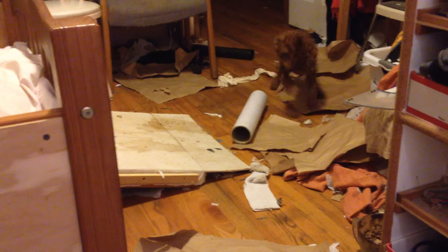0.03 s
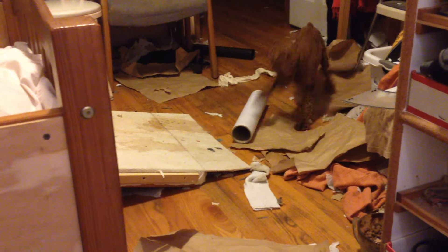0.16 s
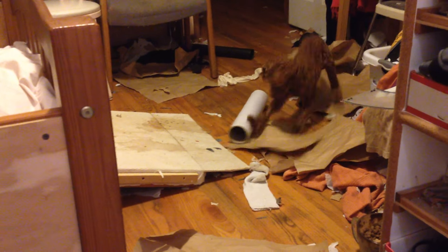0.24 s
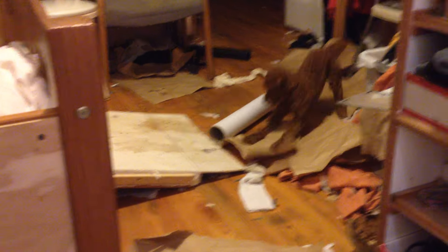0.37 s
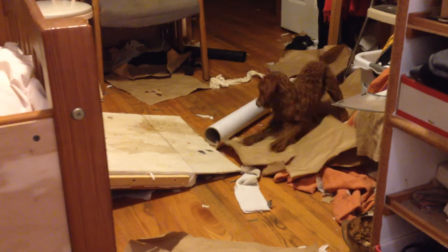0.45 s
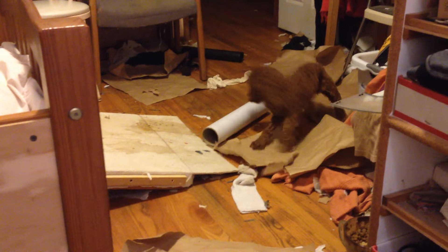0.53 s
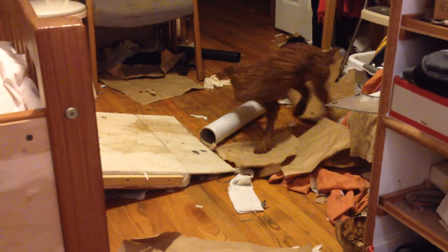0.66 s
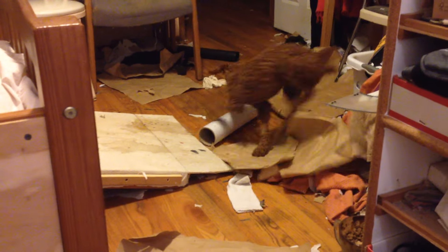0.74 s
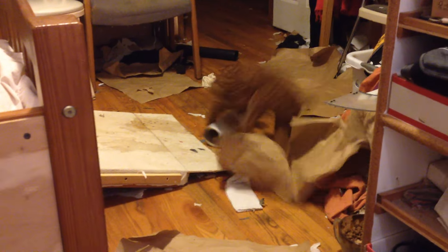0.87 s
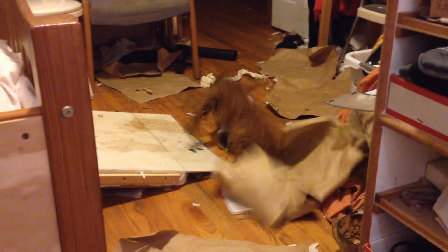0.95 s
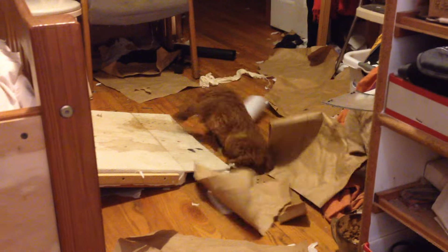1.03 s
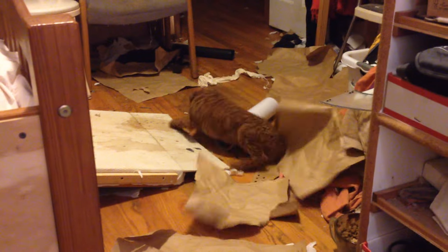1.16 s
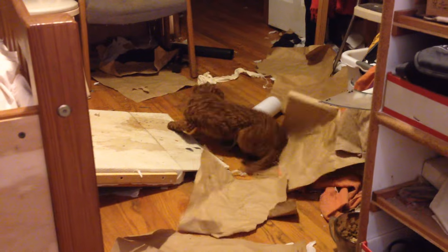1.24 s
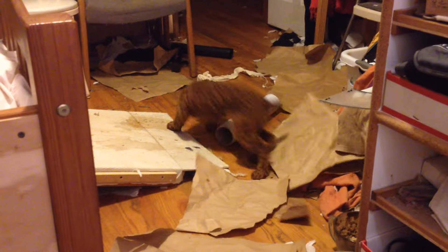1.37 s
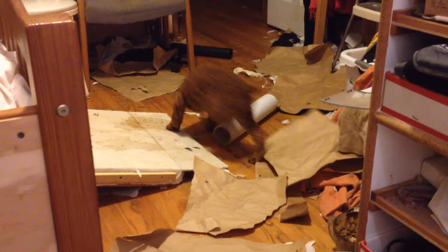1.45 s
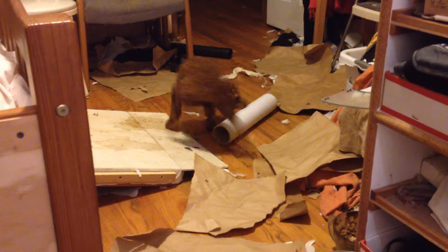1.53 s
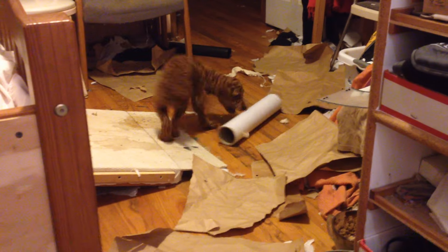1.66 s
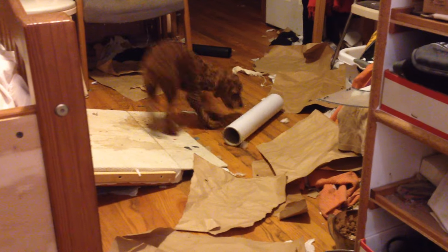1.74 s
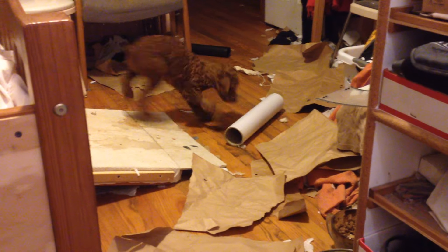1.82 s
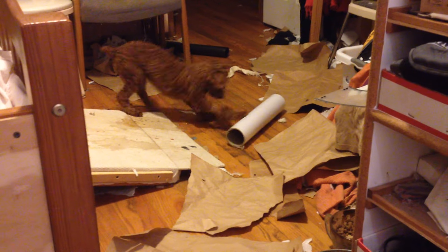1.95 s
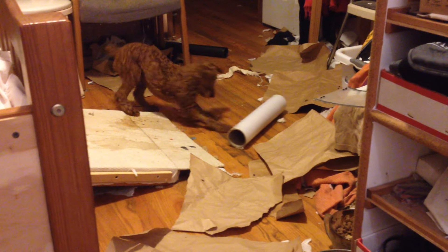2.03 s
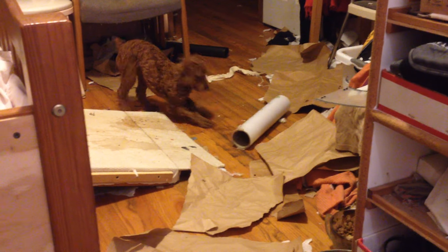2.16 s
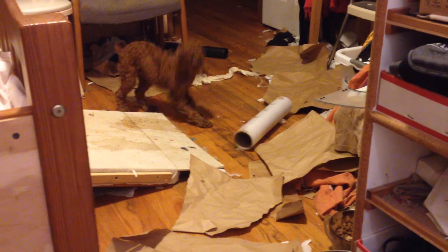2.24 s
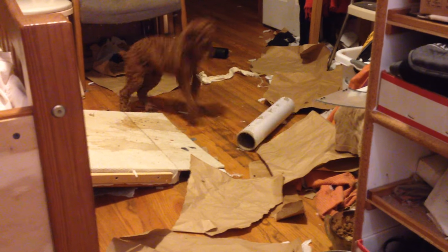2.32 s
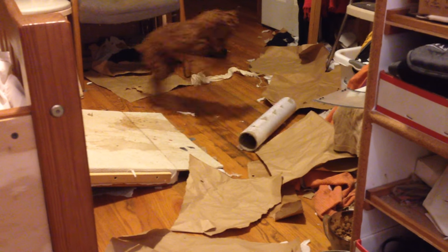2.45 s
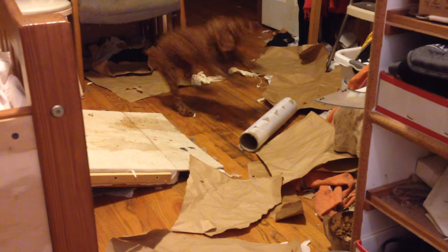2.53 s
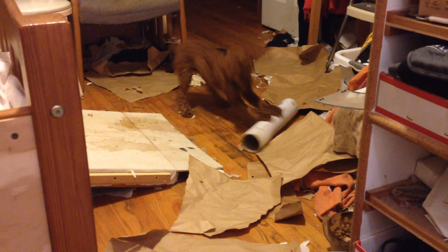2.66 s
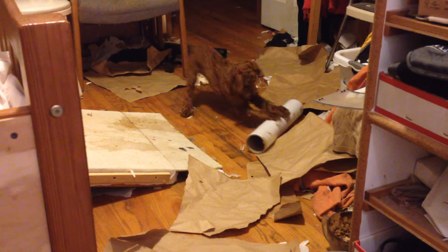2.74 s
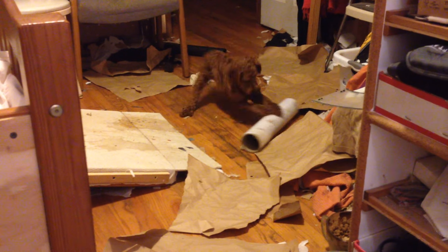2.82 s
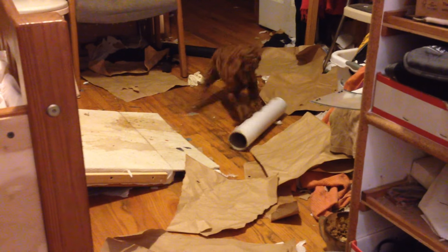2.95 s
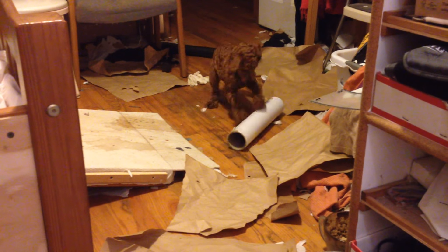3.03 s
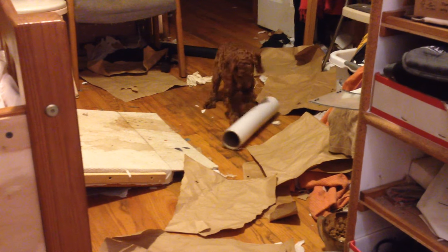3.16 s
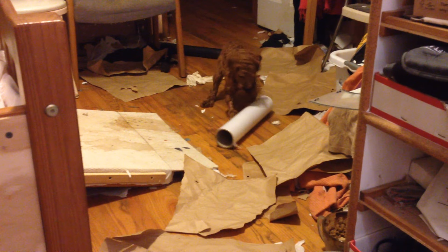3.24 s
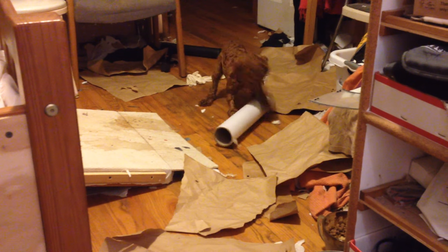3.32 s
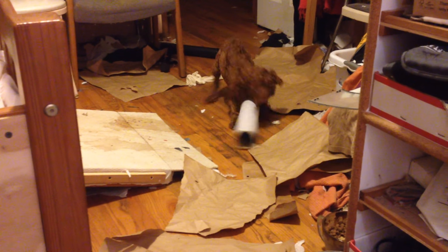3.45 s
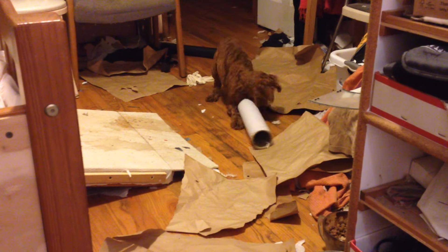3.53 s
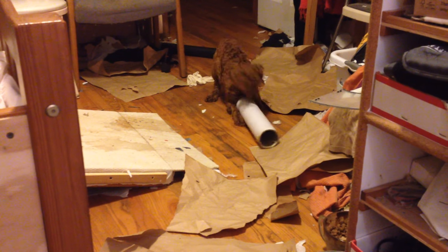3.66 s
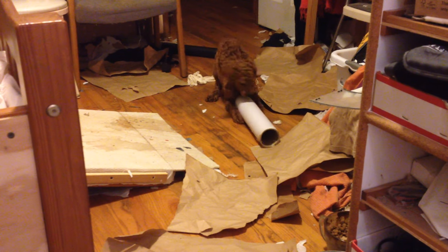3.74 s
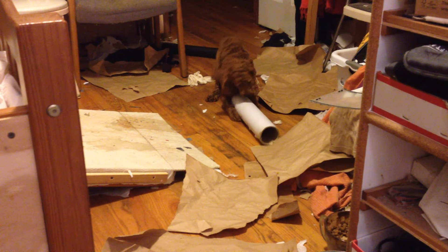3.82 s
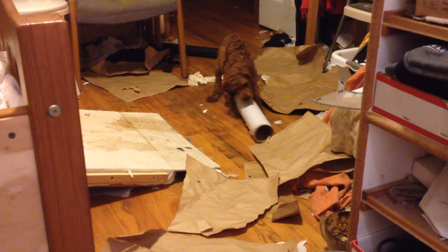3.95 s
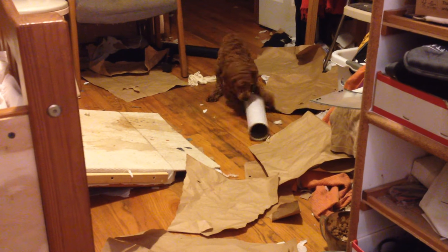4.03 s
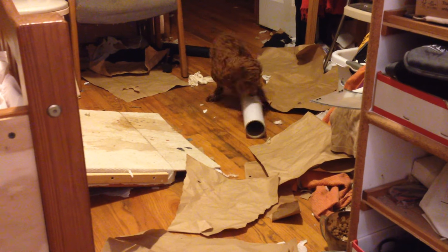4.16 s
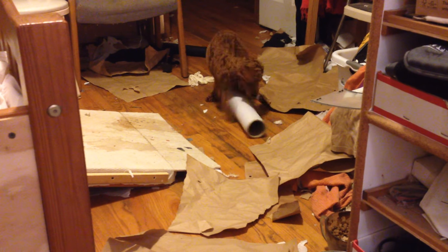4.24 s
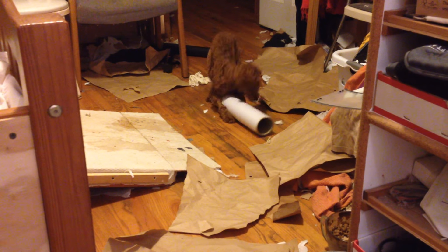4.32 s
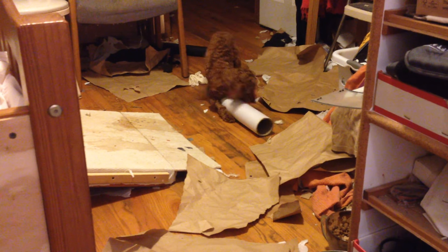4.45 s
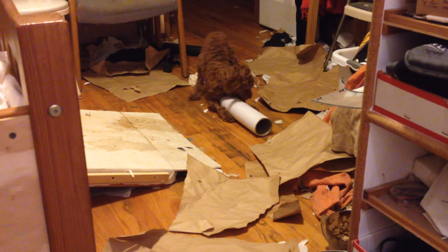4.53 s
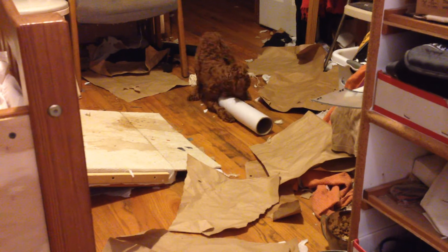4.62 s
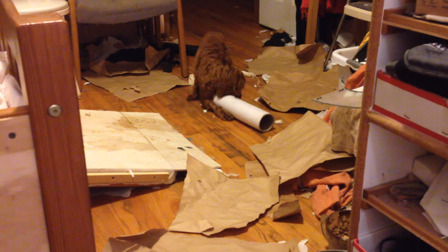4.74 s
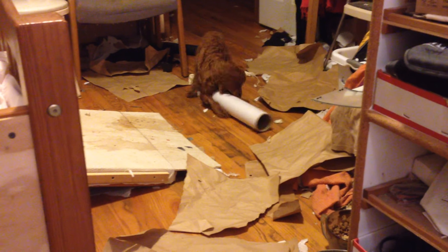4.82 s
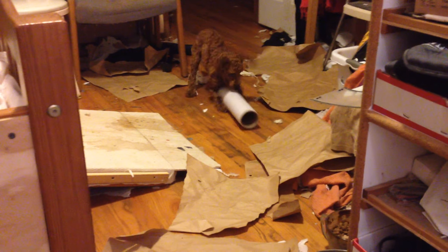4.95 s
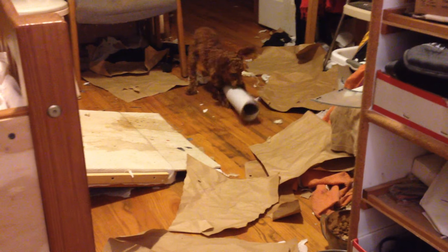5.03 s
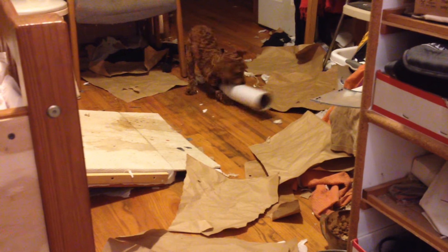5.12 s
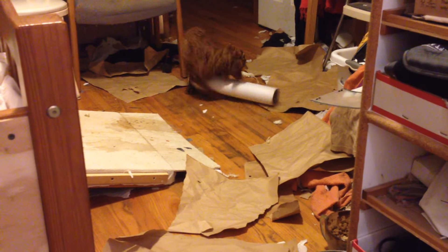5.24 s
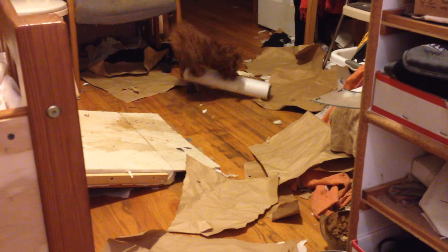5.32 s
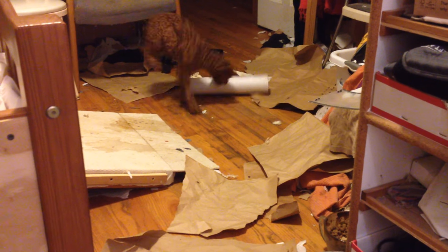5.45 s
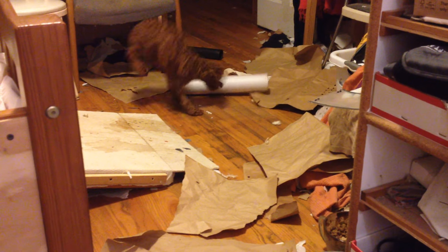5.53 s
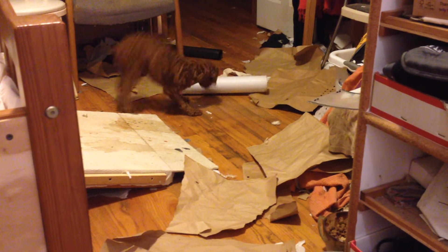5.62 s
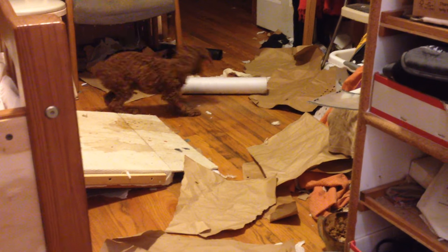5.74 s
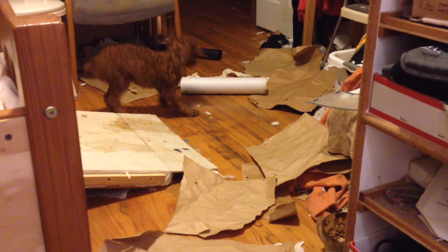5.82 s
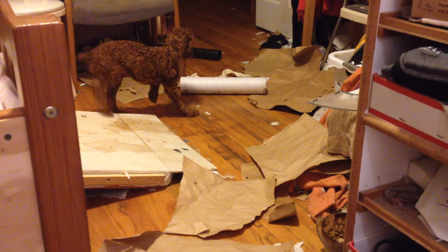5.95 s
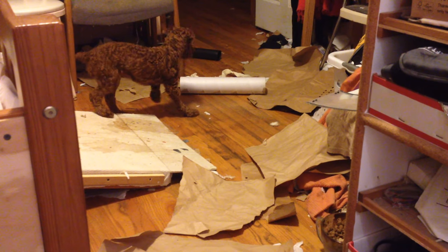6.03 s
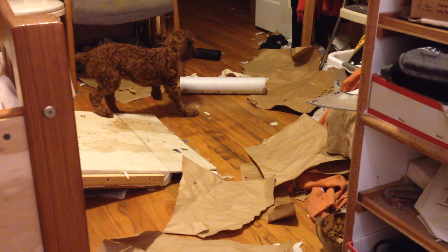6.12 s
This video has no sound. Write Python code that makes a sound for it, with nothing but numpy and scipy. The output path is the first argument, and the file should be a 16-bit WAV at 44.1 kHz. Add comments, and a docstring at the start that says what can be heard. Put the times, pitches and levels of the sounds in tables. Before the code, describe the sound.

Busy paper rustling and crinkling gives way to soft paw thumps, claw scuffs and hollow cardboard tube knocks on floorboards, heard indoors from a few metres.

```python
"""Sheets of packing paper slide and crackle as a puppy romps over them: tiny slips, swelling with each push.
It bats a cardboard tube about on a wooden floor: the tube clacks and rings hollow, and scrapes when dragged.
Claws scuff as dying runs of slips, paws thump ringing board modes, and a board hums under sliding paws.
A small cluttered room, with a quiet noise of its own, carries it all to a microphone a few metres away."""
import sys
import numpy as np
from scipy import signal
from scipy.fft import next_fast_len
from scipy.io import wavfile
from scipy.ndimage import uniform_filter1d

SR = 44100
rng = np.random.default_rng(int(sys.argv[2]) if len(sys.argv) > 2 else 0)


def log_audio(samples):
    """Write samples as a 16-bit WAV file to the path given in sys.argv[1]."""
    # one column per channel
    frames = np.atleast_2d(samples).T
    # limit to full scale, then quantise
    limited = np.clip(frames, -1, 1)
    pcm = np.round(limited * 32767).astype(np.int16)
    wavfile.write(sys.argv[1], SR, pcm)


N = 272538  # samples in the scene
T = np.arange(SR // 2) / SR  # time in s: the half second in which a blow dies away

# air column and wall of the cardboard tube: pitch_hz, level_db, t60_s
TUBE_MODES = [(343.2, -0.5, 0.246), (690, -3.5, .13), (779, 1.5, 0.04), (1210, -22, 0.059),
              (1564, -5, 0.024), (1710, -11, 0.088), (2210, -12, 0.1), (2825, -2, 0.058)]
# spectrum of rubbing paper: frequency_hz, gain_db
PAPER_SPECTRUM = [(40, -23), (100, -27), (190, -2.5), (400, -4), (1000, -2), (2200, 0.5), (3100, -2.5),
                  (4600, -2), (7000, 0), (11000, -11), (15000, -15.5)]


def amp(db):
    """Decibels to gain."""
    return 10 ** (np.asarray(db) / 20)


def unit(x):
    """Scales to rms 1."""
    return x / np.sqrt(np.mean(x ** 2) + 1e-20)


def at_level(x, db):
    """Sets the rms of the first 35 ms of a blow."""
    early_rms = np.sqrt(np.mean(x[T < .035] ** 2) + 1e-20)
    return amp(db) * x / early_rms


def read(points, hz):
    """Reads a table along a log-frequency axis."""
    f, value = np.transpose(points)
    return np.interp(np.log(hz + 1), np.log(f), value)


def colour(x, db_at):
    """Causal minimum-phase filter whose gain in dB is db_at(Hz)."""
    size = next_fast_len(len(x) + 4096)
    hz = abs(np.fft.fftfreq(size, 1 / SR))
    log_gain = np.log(amp(db_at(hz)))
    response = np.exp(signal.hilbert(log_gain).conj())
    return np.fft.ifft(np.fft.fft(x, size) * response).real[:len(x)]


def add(mix, s, sound):
    """Mixes a sound in at time s."""
    part = mix[max(round(s * SR), 0):][:len(sound)]
    part += sound[:len(part)]


def room(x, direct_db=-7, build_s=0.0022, near_s=0.0026):
    """Sound from a fresh spot: the direct path and nearby bounces, then reflections that die band by band."""
    # reverberation of the small cluttered room: frequency_hz, t60_s
    reverb_times = [(150, 0.45), (400, 0.22), (1000, 0.18), (3000, 0.19), (8000, 0.2), (15000, 0.22)]
    echoes = rng.random(len(T)) < 5000 / SR  # about 5000 reflections a second
    taps = rng.standard_normal(len(T)) * echoes * (1 - np.exp(-T / build_s))
    hz, t, z = signal.stft(taps, SR, nperseg=256)
    decay = amp(-60 * t / read(reverb_times, hz)[:, None])
    tail = signal.istft(z * decay, SR, nperseg=256)[1][:len(T)]
    near = rng.standard_normal(len(T)) * np.exp(-T / near_s)
    response = tail / np.linalg.norm(tail) + amp(direct_db) * near / np.linalg.norm(near)
    return signal.fftconvolve(x, response)[:len(x)]


def scatter(clicks, count=5):
    """Deals clicks out among several spots."""
    spot = rng.integers(0, count, len(clicks))
    return [clicks * (spot == k) for k in range(count)]


def slips(count, per_s, spread_db):
    """Tiny stick-slip clicks, a few much larger than the rest."""
    chance, size, sign = rng.random((3, count))
    size_db = spread_db * np.minimum(-np.log(1 - size), 5)
    return (chance < per_s / SR) * np.sign(sign - .5) * amp(size_db)


def ring(modes):
    """Dying modes, each met at a chance phase."""
    return sum(amp(db - 60 * T / t60) * np.sin(2 * np.pi * (hz * T + rng.random()))
               for hz, db, t60 in modes)


def room_quiet(level_db=-66.5):
    """The quiet of the room: steady noise, heaviest in the low end."""
    # spectrum of the quiet: frequency_hz, gain_db
    quiet_spectrum = [(20, -18), (70, 8.5), (125, 8.5), (160, 2), (250, 9.5), (500, 0.5), (1500, -7),
                      (4000, -9), (10000, -12), (15000, -15.5)]
    noise = colour(rng.standard_normal(N), lambda hz: read(quiet_spectrum, hz))
    return amp(level_db) * unit(noise)


def drone(db, length_s, pitch_hz=474, waver=0.052):
    """Stick and slip locks onto one mode of the board and wavers around it."""
    speed = 1 + waver * unit(uniform_filter1d(rng.standard_normal(len(T)), size=300))
    stroke = np.sin(np.pi * np.minimum(T / length_s, 1) ** 0.46) ** 2
    hum = np.sin(2 * np.pi * np.cumsum(pitch_hz * speed) / SR)
    return at_level(hum * stroke, db)


def thump(db, centre_hz, spread, swell_s=0.0062, diffuse_db=-3, push_db=-30, lowest_hz=150):
    """A soft blow wakes the board modes near its centre; the room fills in around them."""
    # floorboard modes, before the weight damps them: pitch_hz, level_db, t60_s
    board_modes = [(152.9, 6, 0.45), (193, 3, 0.31), (218.2, 5.5, 0.25), (248.5, 7, 0.16), (297, -20, 0.16),
                   (343.6, 2.5, 0.15), (431, 4, 0.27), (486, 6.5, 0.25), (612, 10.5, 0.16)]

    def weight_db(hz):
        octaves = np.log2((hz + 1) / centre_hz)
        stiff = 1 / np.sqrt(1 + (lowest_hz / (hz + 1)) ** 20)  # little rings below the lowest mode
        push_gain = amp(push_db) / (1 + (hz / 300) ** 3)  # only the dull push of the weight
        return 20 * np.log10(stiff * np.exp(-.5 * (octaves / spread) ** 2) + push_gain + 1e-5)

    woken = [(hz, level + weight_db(hz), t60) for hz, level, t60 in board_modes]
    boards = ring(woken) * (1 - np.exp(-(T / swell_s) ** 2))
    diffuse = colour(room(signal.unit_impulse(len(T))), weight_db)
    blow = at_level(boards, 0) + at_level(diffuse, diffuse_db)
    blow *= np.exp(-T / 0.18)  # the weight stays on the board and damps it
    # the level is that of the whole blow, its energy reckoned over 42 ms
    return amp(db) * blow / np.sqrt(np.sum(blow ** 2) / (0.042 * SR))


def step(db, centre_hz, spread_octaves=0.38, spread_growth=1.64):
    """A paw thumps the boards; a shorter blow is both higher and wider in pitch, and wakes more modes."""
    spread = spread_octaves * (centre_hz / 250) ** spread_growth  # spread_octaves holds at 250 Hz
    return thump(db, centre_hz, spread)


def scuff(db, body_db, top_db, length_s, snap_db=-3, snap_direct_db=-5, per_s=1500, spread_db=3):
    """One sharp snap, then a dying run of smaller slips; the level is set ahead of the paper colour."""
    run = slips(len(T), per_s, spread_db) * np.exp(-(T / length_s) ** 1.46)
    run /= np.linalg.norm(run) + 1e-9
    snap = room(signal.unit_impulse(len(T)), direct_db=snap_direct_db)
    snap *= amp(snap_db) / (1 + length_s / 0.021)  # long strokes start softly
    heard = snap + sum(room(x) for x in scatter(run, count=3))
    return colour(at_level(heard, db), lambda hz: 20 * np.log10(paper_gain(hz, body_db, top_db)))


def pounce(claw_db, body_db, top_db, skid_s, thump_db, centre_hz, weight_lag_s=0.0071):
    """The claws skid, and the puppy's weight comes down just after."""
    sound = scuff(claw_db, body_db, top_db, skid_s)
    add(sound, weight_lag_s, step(thump_db, centre_hz))
    return sound


def tube_db(hz, lift_db, blur_hz=14):
    """The peaks that the tube's modes put on whatever excites it, widened by the puppy's grip."""
    peaks = sum(amp(db) / (1 + ((hz - f) / (blur_hz + 2.2 / t60)) ** 2) for f, db, t60 in TUBE_MODES)
    return 20 * np.log10(1 + amp(lift_db) * peaks)


def scrape(*row, lift_db=9):
    """The tube is dragged or gnawed: a scuff on it, with which it sings along."""
    return colour(scuff(*row), lambda hz: tube_db(hz, lift_db))


def knock(db, hardness_db, rebound_s, rebound_db, hollow_db, swell_s=0.002, tick_db=-19, tick_s=0.0012):
    """One end of the tube lands, then the other; the rim ticks, the wall clacks and the air inside rings."""
    # spectrum of the tube's clack: frequency_hz, gain_db
    clack_spectrum = [(30, -54), (90, -20.5), (170, 5.5), (350, -6), (700, -2), (1700, -4), (3300, -16),
                      (7000, -17), (15000, -41)]
    click = signal.unit_impulse(len(T))
    blows = room(click, direct_db=-10.0)
    add(blows, rebound_s, amp(rebound_db) * room(click, direct_db=-4.5))
    clack = at_level(colour(blows, lambda hz: read(clack_spectrum, hz)), 0)
    tick = at_level(rng.standard_normal(len(T)) * np.exp(-T / tick_s), tick_db)
    modes = [(hz, level + read(clack_spectrum, hz), t60) for hz, level, t60 in TUBE_MODES]
    hollow = at_level(ring(modes) * (1 - np.exp(-T / swell_s)), hollow_db)
    # hardness tilts the landing, in dB per octave around 1 kHz
    landing = colour(tick + clack + hollow,
                     lambda hz: hardness_db * np.log2(np.clip(hz, 300, 5000) / 1000))
    return at_level(landing, db)


def tube_fall(db, hardness_db, rebound_db, hollow_db, thump_db, centre_hz, spread,
              rebound_s=0.012, board_lag_s=0.00384):
    """The tube clacks down and shakes the boards under it."""
    sound = knock(db, hardness_db, rebound_s, rebound_db, hollow_db)
    add(sound, board_lag_s, thump(thump_db, centre_hz, spread))
    return sound


def paper_db(hz, body_db, top_db):
    """Broad folds give the body, small sharp creases the top."""
    body = read([(900, 1), (2600, 0.018)], hz) * read([(200, 0.91), (600, 1.0)], hz)
    top = read([(3800, 0.079), (11000, 1)], hz)
    return read(PAPER_SPECTRUM, hz) + body_db * body + top_db * top


def paper_gain(hz, body_db, top_db):
    """Paper colour as a gain, scaled by the plain paper's power in the band where the crackle centres."""
    centre = (hz > 2200) & (hz < 4800)
    centre_rms = np.sqrt(np.mean(centre * amp(read(PAPER_SPECTRUM, hz)) ** 2))
    return amp(paper_db(hz, body_db, top_db)) / centre_rms


def crease(db, top_db, body_db=-1, length_s=0.0035):
    """A fold gives way in one short burst."""
    return scuff(db, body_db, top_db, length_s)


def push(t, start, length_s, attack_s=0.01, swell_share=0.18, sag_db_per_s=11.5, stop_db_per_s=400,
         settle_db=-14.5, settle_db_per_s=77):
    """Loudness of one push: it gathers speed, slackens while it lasts and stops; the paper settles faintly."""
    held = np.clip(t - start, 0, length_s)
    after = np.maximum(t - start - length_s, 0)
    swell_s = attack_s + swell_share * length_s  # attack_s is the shortest swell
    swell = np.sin(np.pi / 2 * np.minimum(held / swell_s, 1)) ** 2
    stop = amp(-stop_db_per_s * after)
    settling = amp(settle_db - settle_db_per_s * after)
    return swell * amp(-sag_db_per_s * held) * np.maximum(stop, settling)


def rustle(per_s=2200, spread_db=2.5, level_db=-3.5, clump_db=2,
           crinkles_per_s=70, crinkle_db=-8, crinkle_spread_db=0.5):
    """Dense slips all over the sheets follow the sliding, in clumps as folds give way."""
    # sheets shoved along the floor, levels ahead of level_db:
    # start_s, length_s, level_db, flapping_body_db, crisp_top_db
    shoves = [(-.06, 0.14, -46, -3.5, 1.5), (.115, 0.11, -45.5, 0, -4), (.165, 0.19, -39.5, -2.5, 4),
              (.325, 0.054, -36.5, 1, 3.5), (.39, .09, -41, 3.5, 2.5), (.465, 0.066, -41.5, 12.5, 1),
              (.55, 0.19, -44, -3.5, 1.5), (.745, 0.075, -34, 1.5, -5.5), (.812, .168, -33, -0.5, 2.5),
              (.97, 0.093, -33.5, 7.5, -7), (1.13, 0.1, -47.5, 0.5, 4), (1.24, 0.17, -47.5, 6, 1.5),
              (1.4, .33, -57.5, 4, 3), (2.72, 0.23, -55, -1, 3.5), (2.96, 0.099, -50.5, -3.5, 3.5),
              (5.265, 0.19, -46.5, -1, 5)]
    # the tube or a paw sliding over bare wood, levels ahead of level_db: start_s, length_s, level_db
    slides = [(1.769, 0.02, -57.5), (2.024, 0.065, -54.5), (2.175, 0.047, -51.5), (2.31, .085, -66),
              (2.436, .05, -62.5), (2.515, 0.027, -69), (3.047, 0.32, -61.5), (3.478, 0.11, -54.5),
              (3.575, 0.19, -61), (3.793, 0.11, -58), (3.992, 0.047, -57.5), (4.063, 0.17, -48.5),
              (4.254, .12, -52.5), (4.513, 0.13, -66), (4.653, 0.2, -62), (4.849, 0.42, -58),
              (5.593, .07, -59), (5.774, 0.088, -66.5)]
    slide_body_db, slide_top_db = 2, 2
    pushes = list(shoves) + [(*row, slide_body_db, slide_top_db) for row in slides]

    clumps = amp(clump_db * unit(uniform_filter1d(rng.standard_normal(N), size=400)))
    crackle = unit(clumps * slips(N, per_s, spread_db))
    crinkles = amp(crinkle_db) * unit(slips(N, crinkles_per_s, crinkle_spread_db))  # larger folds, one by one
    clicks = scatter(unit(crackle + crinkles))

    hz, t, z = signal.stft(clicks, SR, nperseg=512)
    power = sum((amp(db + level_db) * push(t, s, length_s) * paper_gain(hz[:, None], body_db, top_db)) ** 2
                for s, length_s, db, body_db, top_db in pushes)
    spots = signal.istft(z * np.sqrt(power), SR, nperseg=512)[1]
    return sum(room(x[:N]) for x in spots)


def scene():
    """All the play over the quiet of the room, alike in both channels."""
    # a board humming under sliding paws: start_s, level_db, length_s
    drones = [(1.21, -41.5, 0.19), (2.18, -48, 0.13)]
    # soft paw falls on the boards: start_s, level_db, centre_hz
    steps = [(.445, -44, 254), (1.029, -24.5, 204.5), (1.082, -32, 226), (1.36, -47, 216),
             (2.198, -45.5, 343), (3, -53.5, 214), (3.255, -49, 220), (3.295, -44.5, 204),
             (3.905, -46, 230), (3.94, -49, 234), (4.265, -43, 248), (4.33, -42.5, 281), (4.532, -61, 183),
             (4.706, -55.5, 196), (5.4, -42, 240), (5.752, -36.5, 224), (5.82, -48.5, 207)]
    # claws scuffing, level ahead of the paper colour: start_s, level_db, body_db, top_db, length_s
    scuffs = [(.03, -49, 6, -25, 0.053), (1.157, -48, -9, -3, 0.019), (1.816, -58, 1.5, 4.5, 0.013),
              (2.017, -50, -1, -18, 0.09), (2.16, -53.5, -2, -0.5, 0.023),
              (2.867, -47.5, -19, -7.5, 0.0049)]
    # pounces, claws first and then the weight:
    # start_s, claw_db (ahead of the paper colour), body_db, top_db, skid_s, thump_db, thump_centre_hz
    pounces = [(1.208, -45, 6, -3, 0.04, -39, 245), (1.646, -57.5, 11.5, -15, 0.038, -44.5, 410),
               (1.937, -63.5, 12, -2, 0.02, -50, 276), (2.087, -49.5, 0.5, 0, .006, -51.5, 265),
               (2.694, -42, 2, 0.5, 0.011, -34, 202), (5.321, -45.5, 2, 1.5, 0.01, -35.5, 274),
               (5.697, -37, -3, -8.5, 0.0027, -30, 288), (5.896, -59.5, 8, -2, 0.0062, -39, 307),
               (6.033, -75, 20, -10, 0.011, -51.5, 220)]
    # the tube dragged or gnawed, level ahead of the paper and tube colours:
    # start_s, level_db, body_db, top_db, length_s
    scrapes = [(2.96, -56.5, -8, -8, 0.037), (3.117, -42, -10, -7, 0.018), (3.235, -48, -15, -12, 0.0037),
               (3.525, -57.5, 0, 2, 0.036), (3.96, -55.5, -3.5, -10, 0.0053), (4.329, -49.5, 3, 6, 0.019),
               (4.767, -57.5, -4, 3.5, 0.009), (4.94, -58.5, -11, -10, 0.072), (5.27, -50.5, 1, -2, 0.0063),
               (5.733, -48, 4, -5, 0.0024)]
    # the tube hitting the floor: start_s, level_db, hardness_db_per_octave, rebound_db, hollow_ring_db,
    # thump_db, thump_centre_hz, thump_spread_octaves
    tube_falls = [(1.708, -41.5, -3.5, -30, -8, -35.5, 353, 0.36),
                  (3.418, -32.5, -0.6, -1, -4.5, -31.5, 276, 0.2),
                  (4.163, -31, -3.5, -10, -3, -28, 263, 0.18),
                  (4.194, -38.5, -5, -24, -12, -29.5, 263, 0.46), (5.206, -49, 0.5, -1, -14, -61, 202, .4),
                  (5.493, -25, 0.5, -0.5, -2.5, -23, 251, 0.53),
                  (5.643, -29, 1, -13, 2.5, -23.5, 297, 0.53)]
    # creases snapping in the paper, level ahead of the paper colour: start_s, level_db, top_db
    creases = [(.373, -30, -48), (.512, -38.5, -16), (.519, -30, -19), (.773, -36, -16),
               (.833, -34.5, -7.5), (.858, -51, -16), (.932, -39, 9.5), (.944, -33, -20), (1.045, -37, -28),
               (1.412, -47.5, -31)]

    mix = room_quiet() + rustle()
    for table, source in ((drones, drone), (steps, step), (scuffs, scuff), (pounces, pounce),
                          (scrapes, scrape), (tube_falls, tube_fall), (creases, crease)):
        for s, *row in table:
            add(mix, s, source(*row))
    return np.array([mix, mix])


def record(dry):
    """The microphone thins the bass and its port notches the treble; then the band limit."""
    # response of the microphone: frequency_hz, gain_db
    microphone = [(20, -23), (115, -3.5), (150, -2), (4700, 0.5), (5120, -11), (5600, -6), (6600, -4),
                  (8600, -3), (11000, 1), (12600, -1.5), (13500, -2)]
    edge_hz = 15450
    heard = np.array([colour(x, lambda hz: read(microphone, hz)) for x in dry])
    band_limit = signal.firwin(611, edge_hz, window=("kaiser", 8), fs=SR)
    return signal.oaconvolve(heard, band_limit[None], "same")


dry = scene()
out = record(dry)
log_audio(out)
```